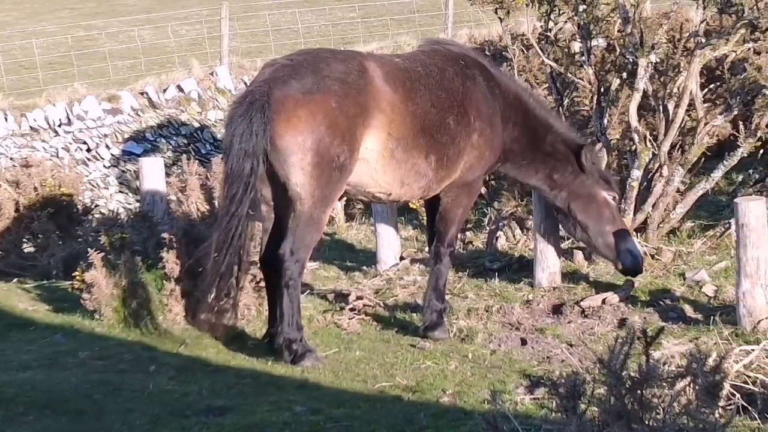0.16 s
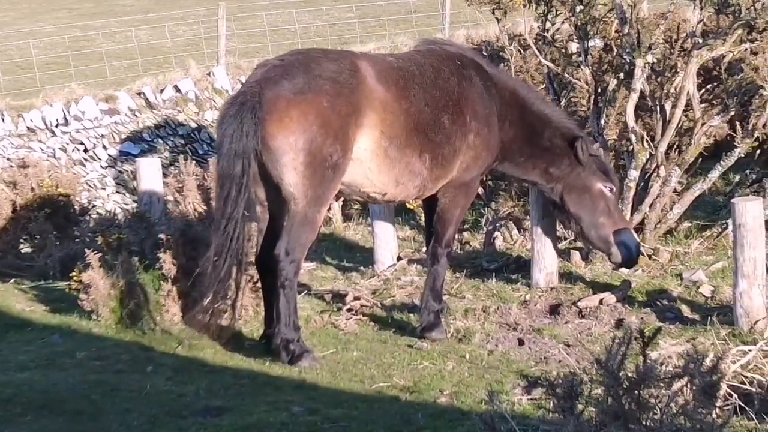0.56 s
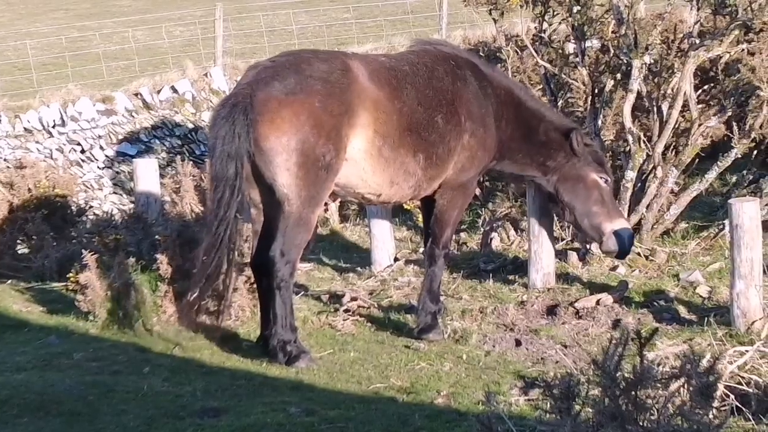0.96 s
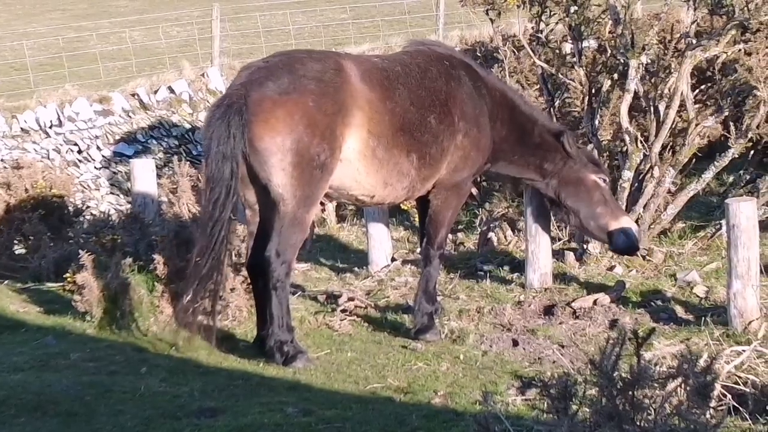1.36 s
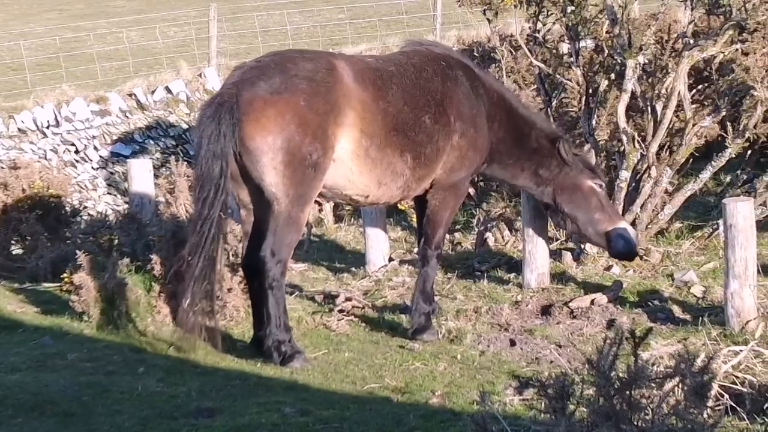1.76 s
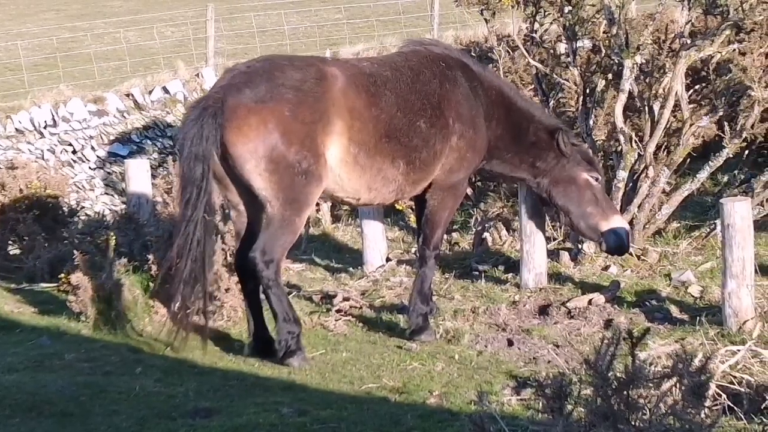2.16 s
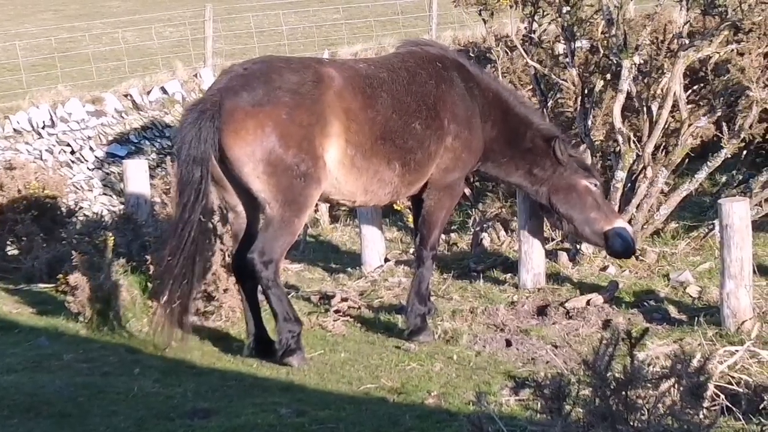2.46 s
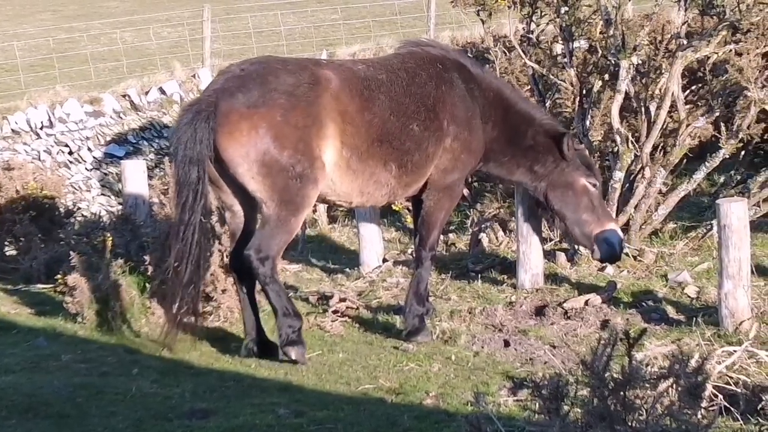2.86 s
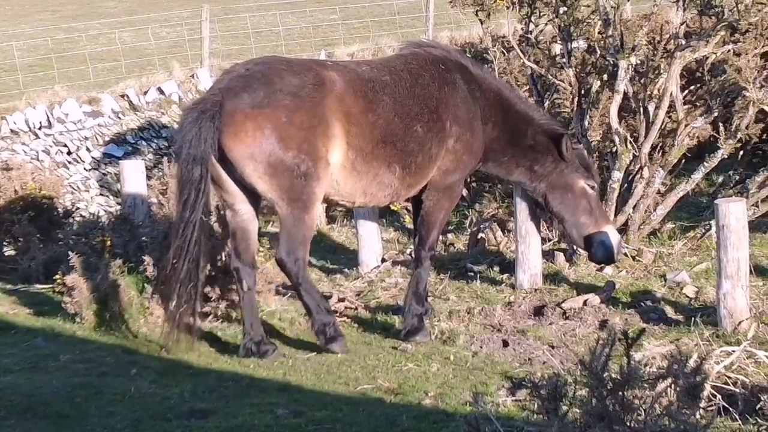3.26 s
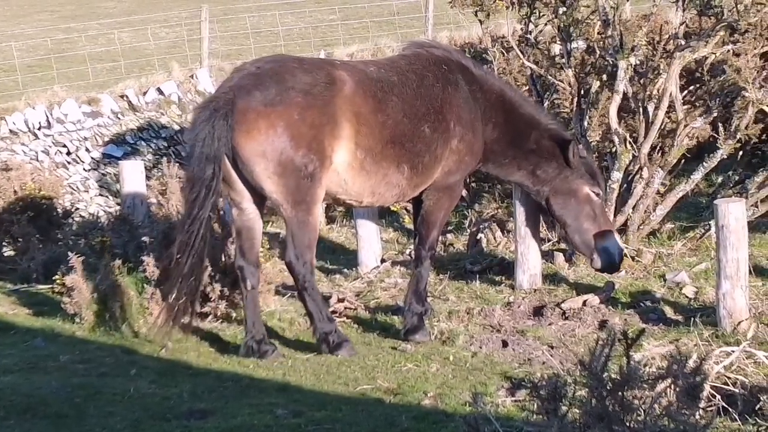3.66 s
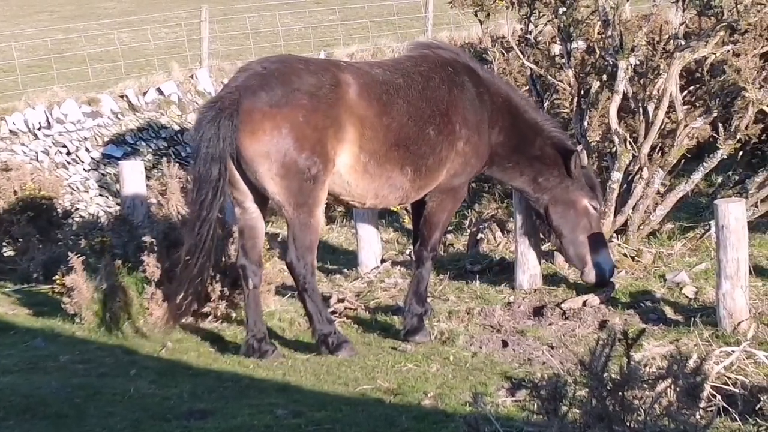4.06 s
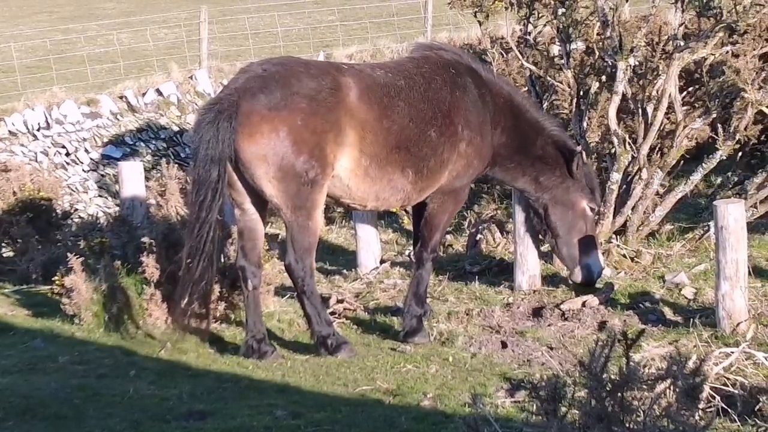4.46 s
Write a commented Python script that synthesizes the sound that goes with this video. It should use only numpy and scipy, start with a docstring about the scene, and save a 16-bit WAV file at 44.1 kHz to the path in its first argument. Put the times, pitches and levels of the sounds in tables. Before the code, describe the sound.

A skylark pours out fast, high warbles, slurs, chirps and a long falling whistle over a low wind rumble and hushed open moorland.

```python
"""A gust rumbles on the microphone from the start and dies away over a low, hushed moor.
A faint high hiss slowly rises and falls; each of these layers is banded stereo noise.
A skylark sings: pure, slightly unsteady tones, bent into warbles, a rattle, slurs, chirps and a long whistle.
A second, fainter bird slightly to the right sings high arches and falling sweeps. A close reflection beats
with the lark; a browsing pony scuffs the turf (noise swells) and snaps twigs (cracks and ringing modes)."""
import sys
import numpy as np
from scipy import signal
from scipy.fft import rfft, irfft, next_fast_len
from scipy.io import wavfile

SR = 44100
rng = np.random.default_rng(int(sys.argv[2]) if len(sys.argv) > 2 else 0)


def transcribe(signal):
    """Save signal, clipped to [-1, 1], as a 16-bit WAV file at the path in sys.argv[1]."""
    frames = np.atleast_2d(signal).T
    limited = np.clip(frames, -1, 1)
    pcm = np.round(limited * 32767).astype(np.int16)
    wavfile.write(sys.argv[1], SR, pcm)


N = 202967
TIME = np.arange(N) / SR

# wind on the microphone: one gust rises, holds and dies away into a light breeze
BREEZE_DB, GUST_DB = -52, -40
GUST_ATTACK_S, GUST_HOLD_S, GUST_RELEASE_S = .13, .77, 0.51
# colour of the wind buffeting: (frequency [Hz], relative density [dB per Hz])
GUST_SPECTRUM = [(18, 5.5), (28, 5), (40, 0), (60, -9), (85, -16), (115, -36), (160, -52)]
# colour of the far moor: (frequency [Hz], relative density [dB per Hz])
MOOR_SPECTRUM = [(100, -0.5), (150, 3.5), (200, -1.5), (300, -6.5), (500, -9.5), (750, -12), (1000, -17),
                 (1500, -13), (2200, -14), (3500, -13), (5000, -26)]
MOOR_DB = -65
# colour of the high hiss: (frequency [Hz], relative density [dB per Hz])
HISS_SPECTRUM = [(2000, -41), (3600, -4), (5200, 6), (6500, 12), (8000, 2.5), (10000, -2), (13000, -3),
                 (15500, 1)]
# rise and fall of the high hiss: (time [s], level before its lift [dB])
HISS_CURVE = [(0.0, -71), (0.55, -73.5), (0.91, -68.5), (1.43, -72.5), (2.28, -66.5), (2.68, -71.5),
              (3.51, -67.5), (4.05, -73.5), (4.6, -73.5)]
# how alike the background noise is at both ears: (frequency [Hz], left-right correlation [-1 to 1])
EAR_LIKENESS = [(30, 1), (120, 0.96), (250, 0.87), (500, 0.13), (1000, 0.017), (2000, 0.11), (5000, 0.13),
                (12000, 0.49)]

BUZZ_CYCLE_S, BUZZ_S_PER_HZ = .005, 1.15e-5   # a wider buzz takes longer to swing

# the second bird's notes, before its trim in the mix:
# (time [s], length [s], start [Hz], middle [Hz], end [Hz], level [dB])
NEIGHBOUR_NOTES = [ (.002, 0.069, 6000, 7110, 6140, -54.5), (0.119, 0.027, 4230, 4530, 4980, -51.5),
                   (0.151, 0.055, 6950, 7230, 7350, -55), (0.213, 0.094, 7320, 7200, 6900, -58.5),
                   (0.343, 0.03, 4430, 4450, 5000, -56.5), (0.368, .130, 7030, 7200, 6880, -56),
                   (0.571, 0.018, 4230, 4590, 4960, -50.5), (0.6, 0.14, 7080, 7260, 6800, -51),
                   (0.801, 0.057, 5840, 5910, 5870, -48.5), (0.872, .06, 5900, 5400, 4520, -56),
                   (1.005, 0.06, 5600, 5860, 5700, -52.5), (1.073, 0.044, 5640, 5610, 4570, -57),
                   (1.17, 0.078, 6200, 6850, 7320, -58), (2.32, .065, 6900, 7060, 7050, -65)]
# its falling sweeps: evenly spaced, growing louder, then holding (levels before the same trim)
SWEEP_START_S, SWEEP_STEP_S = 1.333, .0883
SWEEP_FIRST_DB, SWEEP_GROWTH_DB, SWEEP_FULL_DB = -62, 3, -51.5

# the lark's warble:
# (time [s], length [s], start [Hz], middle [Hz], end [Hz], level [dB], buzz depth [Hz])
WARBLE_NOTES = [ (0.016, 0.044, 4750, 4520, 4480, -59, 60), (.075, .026, 5700, 5500, 5240, -61, 60),
                (0.146, 0.05, 4410, 4250, 4170, -56, 400), (0.196, 0.14, 3630, 2944, 1980, -69, 348),
                (.463, .022, 5960, 5230, 4900, -58, 150), (0.53, 0.0077, 5100, 4400, 4180, -56.5, 0),
                (0.555, .024, 2420, 2700, 3280, -63, 200), (.582, 0.029, 4850, 4550, 4520, -55, 200),
                (.654, 0.063, 4740, 4467, 4535, -46.5, 250), (.746, .019, 4570, 4630, 4620, -41, 0),
                (.757, 0.022, 4700, 3630, 3450, -49, 107), (0.813, .047, 5390, 4990, 4340, -46.5, 180),
                (0.847, 0.029, 3210, 4270, 4140, -49, 93), (1.098, 0.15, 6930, 6620, 5950, -62, 350),
                (1.261, .08, 4310, 4290, 4030, -55.5, 0), (1.337, .11, 4090, 3540, 3400, -59, 160),
                (1.410, .105, 3310, 3124, 2713, -54.5, 170), (1.566, 0.023, 4050, 5230, 5570, -51, 150),
                (1.597, 0.073, 4930, 4957, 4760, -51.5, 115), (1.693, 0.023, 4620, 4950, 5150, -44.5, 450),
                (1.721, .037, 4950, 4676, 4586, -37, 67), (1.777, 0.022, 4720, 4760, 4430, -47.5, 130),
                (1.797, .010, 4570, 3780, 3070, -48.5, 0), (1.816, .025, 3990, 5050, 5140, -46, 280),
                (1.85, .068, 5410, 5340, 5190, -50, 0), (1.968, 0.055, 5550, 4730, 3900, -49, 272),
                (2.02, 0.017, 2980, 3420, 3800, -54, 0), (2.079, .03, 3850, 3930, 3950, -46.5, 0),
                (2.105, 0.0096, 4030, 3410, 3130, -49, 0), (2.125, 0.034, 5030, 4740, 4400, -43, 168),
                (2.192, .064, 4910, 4987, 4710, -44.5, 278), (2.227, .03, 5700, 6000, 5700, -55.5, 400),
                (2.282, 0.038, 4420, 4775, 4300, -38.5, 92), (2.311, 0.049, 4260, 4290, 4420, -41, 195),
                (2.340, .055, 4320, 4400, 4320, -41, 136), (3.449, 0.0098, 4780, 4640, 4270, -42, 0)]
# reflection against the direct path, which is screened more or less as the bird moves:
# (time [s], relative level [dB])
REFLECTION_CURVE = [(0, 1), (.75, 4.5), (2.3, 5.5), (2.85, 9.5), (3.25, 2), (3.5, 11), (3.75, 8), (3.95, 2)]
REFLECTION_DELAY_S = 0.0081

# the pony shifts on the turf: (time [s], length [s], band pitch [Hz], level [dB])
TURF_SCUFFS = [(0.916, 0.082, 387, -75.5), (3.158, 0.038, 474, -68), (3.557, 0.046, 734, -73.5),
               (3.592, 0.1, 378, -75.5), (4.165, 0.033, 1490, -73.5), (4.541, 0.041, 1800, -76)]

# a soft rattle: even ticks that swell and fade
RATTLE_START_S, RATTLE_STEP_S = 0.95, .0262
RATTLE_DB, RATTLE_ENDS_DB = -55, -5   # the ends are relative to the middle

# twig snaps: (time [s], level before sharing between crack and ring [dB],
# brightness [0 ring to 1 crack], modes ring only above [Hz])
TWIG_SNAPS = [(2.2367, -40.5, 0.4, 600), (2.366, -41, 0.97, 600), (4.4204, -35.5, 0.14, 1300)]
# ringing modes of dry wood: (frequency [Hz], level against the snap [dB], t60 [s])
WOOD_MODES = [(770, -20, 0.045), (1515, -11, 0.019), (1935, -11.5, 0.036), (2430, -8.5, 0.027),
              (4180, -12, 0.0088), (5000, -14, 0.0064)]

# slurred calls, a buzz that tips into a fall:
# (time [s], buzz reference level [dB], fall reference level [dB], buzz raised by [Hz])
SLUR_CALLS = [(2.442, -47, -48, 33), (2.600, -46, -45, -13), (3.879, -51.5, -47.5, 149),
              (4.037, -47, -48.5, 4), (4.195, -50.5, -49, -25), (4.354, -48.5, -45.5, -46),
              (4.532, -44, -53, -32)]

# chirps, a flick up and a slide down: (time [s], flick level [dB], slide level [dB], raised by [Hz])
CHIRP_CALLS = [(2.778, -44, -46.5, -60), (2.849, -47, -47.5, -30), (2.922, -43, -42.5, 60),
               (2.995, -43.5, -42, 130), (3.068, -43.5, -47.5, 50), (3.141, -44, -47, 22),
               (3.213, -46, -47, 20), (3.288, -47, -46, -20), (3.366, -45, -45.5, -40)]

# the long whistle: it scoops up to a crest, sinks toward a lower pitch and fades as it goes
WHISTLE_START_S, WHISTLE_LENGTH_S = 3.460, 0.355
WHISTLE_START_DB, WHISTLE_FADE_DB_PER_S = -43.5, -29.5
CREST_S, CREST_WIDTH_S = .021, .066
CREST_HZ, SETTLED_HZ = 5420, 4260   # before the scoop pulls down the start
SCOOP_HZ, SCOOP_S = 350, .008
FLUTTER_HZ, FLUTTER_AT_S, FLUTTER_WIDTH_S = 198, 0.032, 0.022   # it flutters around the crest

CUTOFF_HZ = 15900


def from_db(db):
    """Turn decibels into gain."""
    return 10 ** (np.asarray(db) / 20)


def rms_one(x):
    """Scale to unit power."""
    return x / np.sqrt(np.mean(x ** 2) + 1e-20)


def in_time(rows):
    """Join (time, level) points by straight lines."""
    s, level_db = np.transpose(rows)
    return np.interp(TIME, s, level_db)


def at_hz(points, hz):
    """Read a spectrum on a log-frequency axis."""
    point_hz, value = np.transpose(points)
    return np.interp(np.log(hz), np.log(point_hz), value)


def drift(rate, t):
    """Wander at random, with `rate` new values a second joined by lines."""
    return np.interp(t * rate, np.arange(4096), rng.standard_normal(4096))


def delayed(x, s):
    """Delay by s seconds, down to fractions of a sample, by turning the phase of the spectrum."""
    size = next_fast_len(N + 4096)
    turns = np.arange(size // 2 + 1) * s / size * SR
    return irfft(rfft(x, size) * np.exp(-2j * np.pi * turns), size)[:N]


def bandpass(x, low_hz, high_hz):
    """Keep one band of a sound."""
    return signal.sosfilt(signal.butter(2, [low_hz, high_hz], "band", fs=SR, output="sos"), x)


def add(track, s, sound):
    """Mix a sound in at s seconds."""
    i = max(0, round(s * SR))
    track[i:i + len(sound)] += sound[:N - i]


def banded_noise(spectrum, low_hz, high_hz, patchy_db):
    """Half-octave bands of stereo noise, each with its own flicker and left-right likeness."""
    count = round(2 * np.log2(high_hz / low_hz))
    edges = np.geomspace(low_hz, min(high_hz, SR / 2.2), count + 1)
    white = rng.standard_normal((2, 2, N + SR // 4))   # the extra quarter second settles the filters
    out = 0
    for k, (low, high) in enumerate(zip(edges, edges[1:])):
        # adjoining bands use different noise
        mid, side = bandpass(white[k % 2], low, high)[:, -N:]
        hz = np.sqrt(low * high)
        alike = np.clip(at_hz(EAR_LIKENESS, hz), -1, .997)
        gain = from_db(at_hz(spectrum, hz) + patchy_db * drift(14, TIME))
        out = out + gain * (np.sqrt(1 + alike) * mid + np.sqrt(1 - alike) * side * [[1], [-1]])
    return rms_one(out)


def wind_gust(lumpy_db=2, lumps_per_s=14):
    """Low noise buffets the microphone in lumps as the gust rises, holds and dies down."""
    dying = np.exp(-np.maximum(TIME - GUST_ATTACK_S - GUST_HOLD_S, 0) / GUST_RELEASE_S)
    strength = np.minimum(TIME / GUST_ATTACK_S, dying)
    level_db = BREEZE_DB + (GUST_DB - BREEZE_DB) * strength
    level_db = level_db + lumpy_db * drift(lumps_per_s, TIME)
    return from_db(level_db) * banded_noise(GUST_SPECTRUM, 18.82, 159.5, patchy_db=.5)


def moor_hush():
    """The hush of the far moor holds its level while its bands flicker."""
    return from_db(MOOR_DB) * banded_noise(MOOR_SPECTRUM, 112.6, 4700, patchy_db=3.0)


def high_hiss(lift_db=8.0):
    """High noise whose level slowly rises and falls."""
    level = from_db(in_time(HISS_CURVE) + lift_db)
    return level * banded_noise(HISS_SPECTRUM, 1490, 20000, patchy_db=0.83)


def syrinx(hz, wobble_hz=26, shimmer_db=1.6):
    """A nearly pure tone whose pitch and strength are never quite steady."""
    t = np.arange(len(hz)) / SR
    hz = hz + wobble_hz * drift(395.6, t)
    strength = np.sqrt(2) * from_db(shimmer_db * drift(220, t))   # unit RMS before shimmer
    return strength * np.sin(2 * np.pi * np.cumsum(hz) / SR)


def note(length, start_hz, middle_hz, end_hz, db, buzz_hz=0, pulsing=0.37, edge=0.39, spiky=0.38):
    """One arched note; a buzz flicks its pitch upward, and each flick thins the tone."""
    t = np.arange(int(length * SR)) / SR
    u = t / length
    arch = np.polyval(np.polyfit([0, .5, 1], [start_hz, middle_hz, end_hz], 2), u)
    cycle_s = BUZZ_CYCLE_S + BUZZ_S_PER_HZ * buzz_hz
    phase = 2 * np.pi * t / cycle_s + .35 * drift(100, t)
    swing = np.sin(phase) - spiky * np.cos(2 * phase)   # sharper above than below
    swing = swing * (buzz_hz > 50)
    envelope = np.sin(np.pi * u) ** edge * (1 - pulsing * swing)
    return from_db(db) * envelope * syrinx(arch + buzz_hz * swing)


def neighbour(echo_db=-11, count=10):
    """The second bird: thin high arches, then a run of falling sweeps, with a short faint echo."""
    song = np.zeros(N)
    for s, *shape in NEIGHBOUR_NOTES:
        add(song, s, note(*shape))
    for k in range(count):
        db = min(SWEEP_FIRST_DB + k * SWEEP_GROWTH_DB, SWEEP_FULL_DB)
        add(song, SWEEP_START_S + k * SWEEP_STEP_S, note(.043, 6150, 4430, 3955, db, edge=0.57))
    return song + from_db(echo_db) * delayed(song, .0029)


def skylark():
    """The whole song, summed with a delayed reflection that beats with it."""
    song = rattle()
    for s, *shape in WARBLE_NOTES:
        add(song, s, note(*shape))
    for s, *shape in SLUR_CALLS:
        add(song, s, slur(*shape))
    for s, *shape in CHIRP_CALLS:
        add(song, s, chirp(*shape))
    add(song, WHISTLE_START_S, whistle())
    echo = from_db(in_time(REFLECTION_CURVE))
    both_paths = song + echo * delayed(song, REFLECTION_DELAY_S)
    return both_paths / np.sqrt(1 + echo ** 2)   # the balance shifts, the summed power does not


def hooves():
    """Each scuff is a short, dull swell of crushed grass: banded noise."""
    out = np.zeros(N)
    for s, length, hz, db in TURF_SCUFFS:
        size = int(length * SR)
        grass = rng.standard_normal(size) * np.hanning(size)
        add(out, s, from_db(db) * rms_one(bandpass(grass, hz / 1.03, hz * 1.185)))
    return out


def rattle(count=10):
    """A row of tiny rising ticks, loudest in the middle."""
    out = np.zeros(N)
    for k, place in enumerate(np.linspace(-1, 1, count)):
        db = RATTLE_DB + RATTLE_ENDS_DB * place ** 2
        add(out, RATTLE_START_S + k * RATTLE_STEP_S, note(.009, 3500, 4000, 4400, db, buzz_hz=150))
    return out


def twigs(crack_s=0.0022):
    """A short crack rings the wood; thin twigs lack the low modes and the brightest mostly tick."""
    cracks = np.zeros(N)
    t = np.arange(SR // 100) / SR
    for s, db, bright, _ in TWIG_SNAPS:
        burst = rng.standard_normal(len(t)) * np.exp(-t / crack_s)
        add(cracks, s, from_db(db) * bright * burst)
    out = bandpass(cracks + 1e-18, 4200, 11000)
    t = np.arange(SR // 10) / SR
    for s, db, bright, lowest_hz in TWIG_SNAPS:
        for k, (hz, mode_db, t60) in enumerate(WOOD_MODES):
            if hz > lowest_hz:
                ring = 1000 ** (-t / t60) * np.sin(2 * np.pi * hz * t)
                sign = (-1) ** k   # neighbouring modes start in opposite directions
                add(out, s, sign * (1 - min(bright, 1)) * from_db(db + mode_db) * ring)
    return out


def slur(buzz_db, fall_db, raised_hz, rate=128, rise_hz=720, pulsing=0.84, uneven_db=2):
    """Uneven rising pulselets merge into a smooth falling tone."""
    t = np.arange(int(.126 * SR)) / SR
    knots_s = [0, .012, .038, .064, .076, .091, .111, .126]
    pitch = np.interp(t, knots_s, [3243, 3180, 3403, 3504, 3037, 2736, 2530, 2350])
    buzz_part_db = [buzz_db - 12, buzz_db - 2.5, buzz_db, buzz_db - 2.0]
    fall_part_db = [fall_db + 4, fall_db - 4.5, fall_db - 5.5, fall_db - 23]
    level_db = np.interp(t, knots_s, buzz_part_db + fall_part_db)
    buzz = np.interp(t, [.04, .066], [1, 0])   # the pulselets melt away
    cycle = (rate * t + 0.17 * drift(74.4, t)) % 1
    gate = 1 - pulsing * buzz * np.cos(np.pi * cycle) ** 2
    level_db = level_db + uneven_db * buzz * drift(rate, t)
    pitch = pitch + buzz * (raised_hz + rise_hz * (cycle - .5))
    return from_db(level_db) * gate * syrinx(pitch)


def chirp(flick_db, slide_db, raised_hz, gap_s=.009):
    """The pitch shoots up, the voice breaks off at the top and slides back."""
    u = np.linspace(0, 1, int(.0205 * SR))
    pitch = 4120 + (2300 + raised_hz) * u ** 3.57
    flick = np.sin(np.pi * u ** 1.74).clip(0) ** 0.99 * syrinx(pitch)
    slide = note(0.018, 6200 + raised_hz, 5520 + raised_hz, 5080, slide_db, edge=1.1)
    return np.concatenate([from_db(flick_db) * flick, np.zeros(int(gap_s * SR)), slide])


def whistle(attack_s=0.0025, release_s=0.009):
    """A quick scoop up, then a long fall in pitch; the strength flutters near the start."""
    t = np.arange(int(WHISTLE_LENGTH_S * SR)) / SR
    crest = (CREST_HZ - SETTLED_HZ) / (1 + ((t - CREST_S) / CREST_WIDTH_S) ** 2)
    pitch = SETTLED_HZ + crest - SCOOP_HZ * np.exp(-t / SCOOP_S)
    flutter = np.exp(-((t - FLUTTER_AT_S) / FLUTTER_WIDTH_S) ** 4)
    throb = 1 - flutter * np.sin(np.pi * FLUTTER_HZ * t) ** 2
    envelope = np.clip(np.minimum(t / attack_s, (t[-1] - t) / release_s), 0, 1)
    level = from_db(WHISTLE_START_DB + WHISTLE_FADE_DB_PER_S * t)
    return level * envelope * throb * syrinx(pitch, wobble_hz=2.9, shimmer_db=.7)


def diffuse_tail(x, t60):
    """A faint diffuse noise tail follows the sounds, different at each ear."""
    t = np.arange(SR // 2) / SR
    tail = rng.standard_normal((2, len(t))) * from_db(-60 * t / t60) * (t > .004)
    tail /= np.sqrt(np.sum(tail ** 2, axis=1, keepdims=True))
    return signal.fftconvolve(x[None], tail, axes=1)[:, :N]


def placed(x, lag_us, pan_db):
    """Place a source: the right ear hears it lag_us later and pan_db softer than the left."""
    left = x * from_db(pan_db / 2)
    right = delayed(x, lag_us / 1e6) * from_db(-pan_db / 2)
    return np.array([left, right])


def scene():
    """Two birds and the pony's small noises, with a faint tail, over wind, moor and hiss."""
    background = wind_gust() + moor_hush() + high_hiss()
    other, lark, pony = neighbour(), skylark(), hooves() + twigs()
    direct = placed(lark, lag_us=21.6, pan_db=-0.1)
    direct += placed(other, lag_us=-51.0, pan_db=-1.0) * from_db(-1.0)   # the second bird's trim
    direct += placed(pony, lag_us=5, pan_db=2.0)
    tail = from_db(-14.5) * diffuse_tail(lark + other + pony, t60=.17)
    return direct + tail + background


def record(dry):
    """A steep low-pass cuts off the top."""
    return signal.sosfilt(signal.ellip(12, .1, 80, CUTOFF_HZ, fs=SR, output="sos"), dry)


dry = scene()
out = record(dry)
transcribe(out)
```